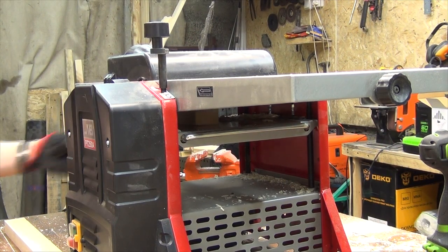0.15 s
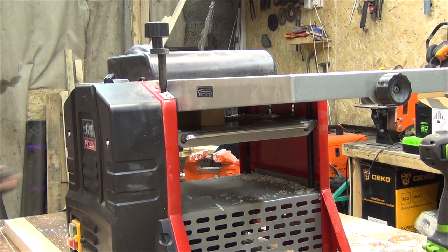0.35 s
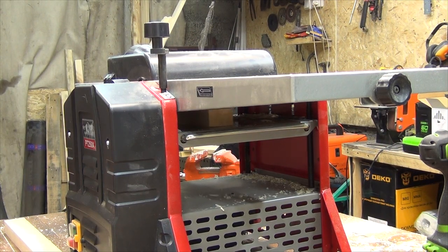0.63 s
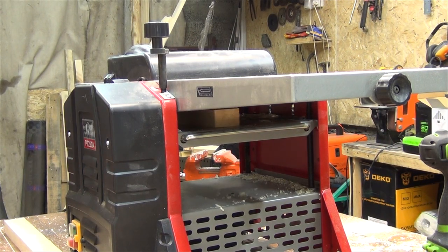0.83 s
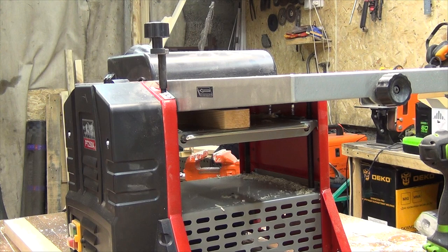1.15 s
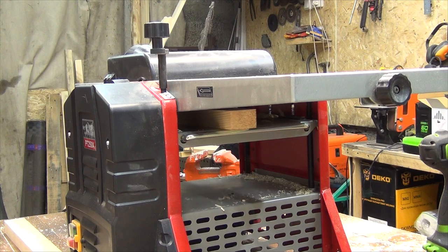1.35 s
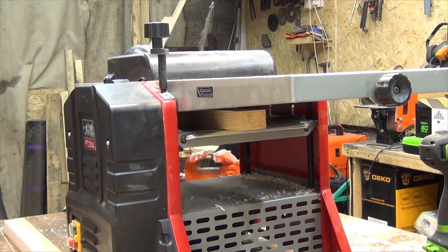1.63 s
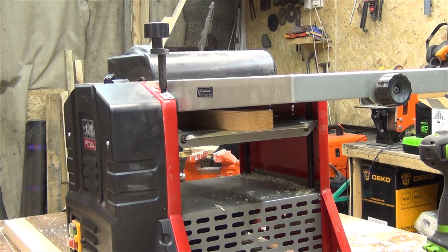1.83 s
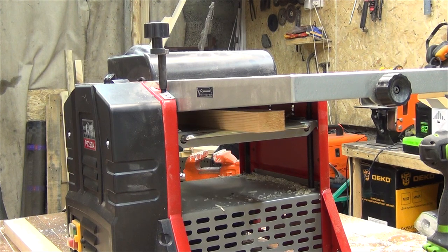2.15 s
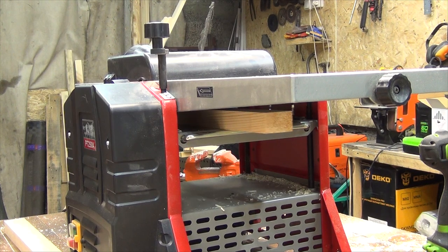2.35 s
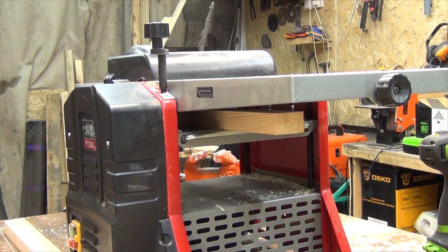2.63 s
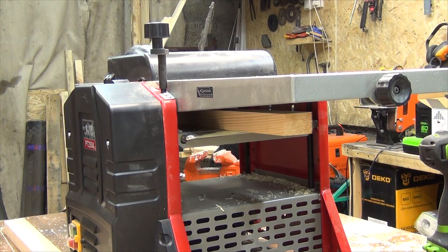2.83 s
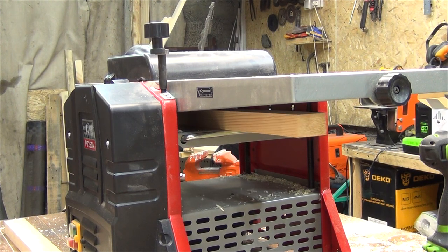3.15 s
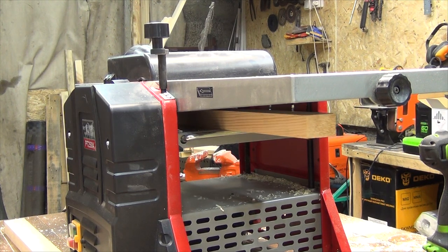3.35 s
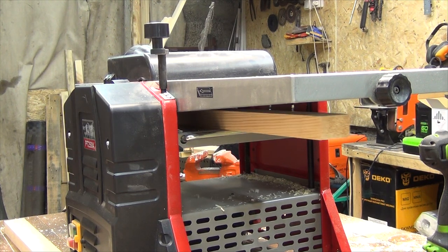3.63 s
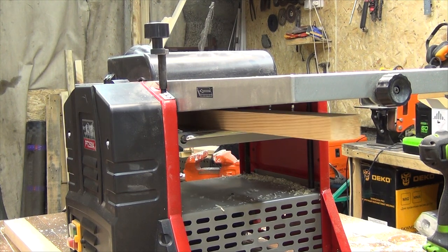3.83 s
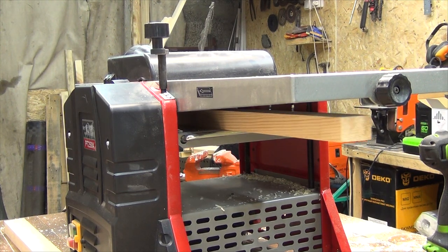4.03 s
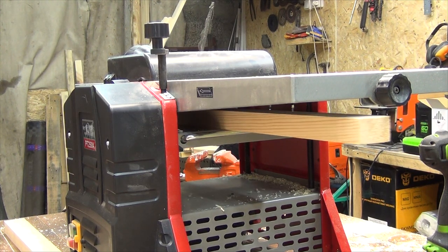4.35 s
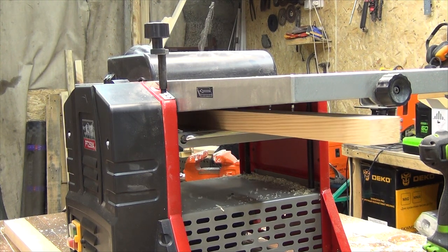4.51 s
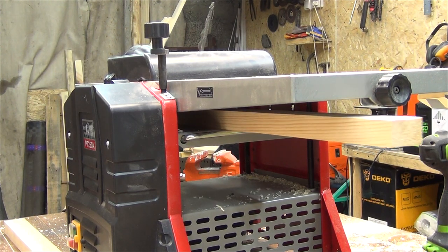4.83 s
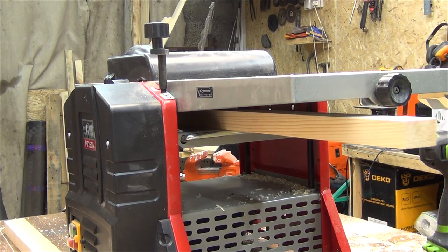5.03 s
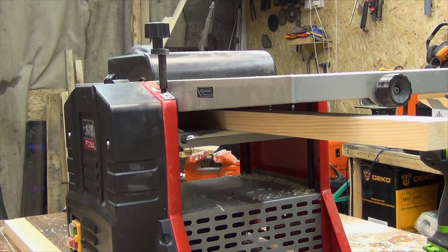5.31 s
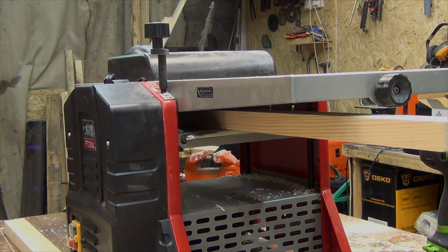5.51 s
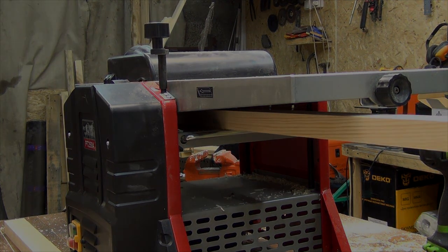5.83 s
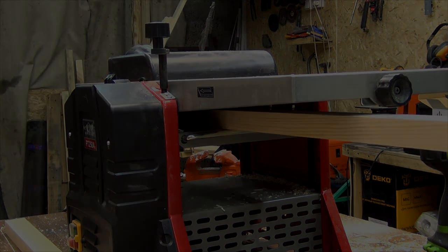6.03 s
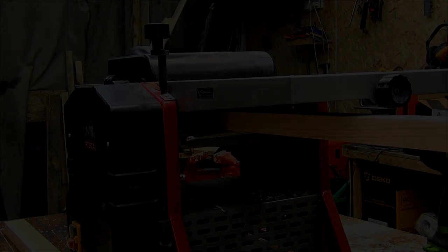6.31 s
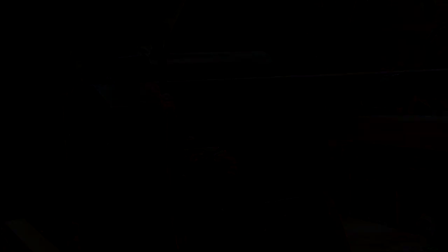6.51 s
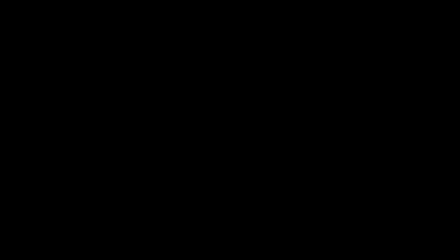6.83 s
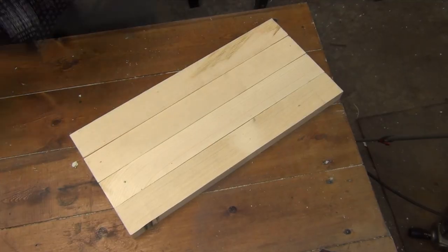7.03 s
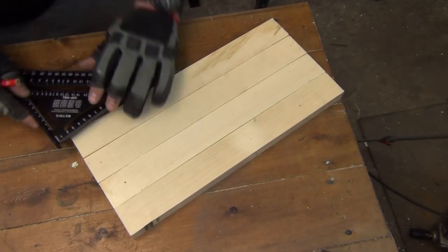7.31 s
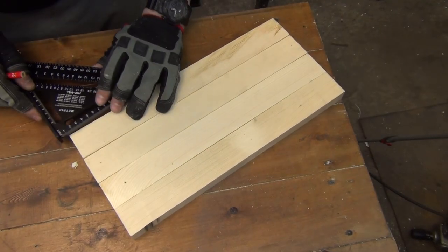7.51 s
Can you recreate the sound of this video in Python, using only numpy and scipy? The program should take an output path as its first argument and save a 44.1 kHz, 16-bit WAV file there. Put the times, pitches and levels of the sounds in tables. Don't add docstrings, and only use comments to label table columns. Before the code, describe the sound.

Close to a thickness planer in a workshop, the motor drone sags in pitch as a board enters, then holds steady with a rough buzz, shifting high whines and hissing wood chips. Late on it drops slightly under harder grain and grows harsher. It cuts off instantly to near silence, where a gloved hand slides a metal square over wood with brief, faint ringing scrapes. A bright camera microphone hears both, nearly mono.

```python
import sys
import numpy as np
from scipy import signal
from scipy.fft import rfft, irfft, next_fast_len
from scipy.io import wavfile
from scipy.ndimage import uniform_filter1d, map_coordinates

SR = 44100
rng = np.random.default_rng(int(sys.argv[2]) if len(sys.argv) > 2 else 0)


def generate_wav(signal):
    frames = np.transpose(np.atleast_2d(signal))
    scaled = np.clip(frames, -1, 1) * 32767
    pcm = np.round(scaled).astype(np.int16)
    wavfile.write(sys.argv[1], SR, pcm)


def boost_factor(decibels):
    exponent = np.asarray(decibels, float) / 20
    return 10 ** exponent


N = 337806
TIME = np.arange(N) / SR
PAD = next_fast_len(N)
FREQ = np.fft.rfftfreq(PAD, 1 / SR) + 1
LOG_FREQ = np.log(FREQ)
HARD_FROM_S, HARD_RISE_S = 5.78, 0.19

# frequency in Hz, side minus mid in dB.
PORT_WIDTH = [(40, 4), (90, -7), (200, -36), (700, -12), (1400, -23), (2200, -26.5), (4800, -17.5),
              (5700, -13), (8000, -17.5), (9200, -24), (11000, -40), (15000, -50)]
# frequency in Hz, left minus right in dB.
PORT_LEAN = [(60, -8), (110, -0.5), (200, -2), (380, 0), (700, 0), (1290, -1), (2380, 0.5), (4400, -0.5),
             (8120, -0.5), (15000, 0.5)]


def noise():
    return rng.standard_normal(N)


def walk(rate, size=8):
    steps = rng.standard_normal(int(N / SR * rate) + 2).astype(np.float32)
    ramps = np.interp(TIME[::size] * rate, np.arange(len(steps)), steps)
    slewed = 1.3 * uniform_filter1d(ramps, int(SR / rate / size))
    return np.repeat(slewed, size)[:N].astype(np.float32)


def arch(s, length):
    out = np.zeros(N, np.float32)
    on = slice(max(int(s * SR), 0), int((s + length) * SR))
    out[on] = np.maximum(np.sin(np.pi * (TIME[on] - s) / length), 0)
    return out


def window(s, length):
    return np.sqrt(arch(s, length))


def arches(table, order):
    return sum(db * arch(s, length) for s, length, k, db in table if round(k) == order)


def columns(table):
    s, *rest = np.transpose(table)
    return [np.interp(TIME, s, c) for c in rest]


def shape_db(points):
    hz, db = np.transpose(points)
    return np.interp(LOG_FREQ, np.log(np.maximum(hz, 1)), db)


def shaped(x, gain):
    return irfft(rfft(x.astype(np.float32), PAD) * gain.astype(np.float32), PAD)[:N]


def colour(x, points, lo_hz=1, hi_hz=30000):
    edges = 1 / np.sqrt((1 + (lo_hz / FREQ) ** 16) * (1 + (FREQ / hi_hz) ** 16))
    y = shaped(x, boost_factor(shape_db(points)) * edges)
    return y / np.std(y)


def resonance(x, hz, width_hz):
    b, a = signal.iirpeak(hz, hz / width_hz, SR)
    y = signal.lfilter(b, a, signal.lfilter(b, a, x))
    return y / np.std(y)


def ports(mid, other, width):
    side = shaped(other, boost_factor(shape_db(width)))
    side = side + shaped(mid, shape_db(PORT_LEAN) * np.log(10) / 40)
    return np.array([mid + side, mid - side])


def hard():
    return np.clip((TIME - HARD_FROM_S) / HARD_RISE_S, 0, 1)


def drum_turns():
    # time in seconds, drum turns in Hz.
    load = [(0, 120.2), (2.5, 120.5), (2.85, 120.1), (3.1, 119.8), (3.5, 120.2), (3.85, 120.1), (4.17, 120),
            (4.57, 120.1), (5.15, 120.6), (5.64, 121.3), (5.74, 120.7), (5.83, 119.5), (5.93, 116.6),
            (6.17, 116.8), (6.31, 115.4), (6.41, 114.8), (6.66, 115.3), (6.87, 116)]
    idle_surplus_hz, slow_down_s = 17.4, 0.85
    hz = columns(load)[0] + idle_surplus_hz * np.exp(-TIME / slow_down_s)
    return np.cumsum(hz) / SR


def order_db(order):
    # order of the turn, steady level in dB, change in dB as the board enters, change in dB on hard grain.
    order_levels = [(1, -65, -4.5, -3.5), (2, -51, -3.5, -7.5), (3, -71, -5, -2), (4, -56.5, 7.5, -1.7),
                    (5, -61, -6.5, 0.7), (6, -55.5, 6, 8), (7, -63, -7, 4), (8, -60.0, 4, 0.5),
                    (9, -69, 7, -3), (10, -51, 0.5, -5), (11, -62, -9, -2), (12, -66.5, 12.5, 7),
                    (13, -64, -2, -6.5), (14, -55.5, -13.5, 0), (15, -64, -13, 1.5), (16, -62, -11, -4),
                    (17, -75.5, -1, -0.5), (18, -68.5, -21, -0.5), (19, -79, -1, 8)]
    # start in seconds, length in seconds,
    # order, change in dB.
    order_swings = [(0.266, 0.45, 12, 2.5), (0.42, 0.45, 10, 4.5), (0.573, 0.64, 6, 6.5), (0.74, 0.41, 9, 8.5),
                    (0.74, 0.65, 17, 11), (0.94, 0.9, 15, 4.5), (0.94, 1.86, 10, 3.5), (1.14, 0.36, 4, 8),
                    (1.18, 0.62, 8, 5.5), (1.22, 0.9, 3, 9.5), (1.3, 0.59, 13, 5), (1.655, 1.5, 9, 7),
                    (1.78, 0.45, 17, 10), (2.3, 1.3, 16, 6), (3.02, 0.9, 17, 11), (3.18, 0.68, 6, 4),
                    (3.42, 0.65, 12, 8), (3.9, 0.66, 6, 3), (4.06, 1.52, 1, 5), (4.18, 0.45, 19, 16),
                    (4.18, 0.96, 13, 4.5), (4.22, 0.9, 15, 4.5), (4.94, 0.93, 12, 8), (5.1, 0.3, 14, 8),
                    (5.38, 0.47, 6, 5.5), (5.7, 0.78, 17, 15), (5.74, 0.2, 16, 8), (5.859, 0.5, 8, 5.5),
                    (6.295, 0.57, 5, 9),
                    (0.5, 0.32, 13, -12.3), (0.54, 0.47, 14, -7), (0.654, 1.44, 4, -10.5), (0.74, 0.3, 12, -13),
            (0.78, 0.49, 16, -11), (0.94, 0.3, 11, -15), (0.94, 1.3, 16, -12.4), (1.26, 0.84, 1, -15),
            (1.3, 0.68, 14, -8), (1.38, 0.42, 7, -17), (1.38, 0.45, 12, -17), (1.7, 0.86, 11, -7),
            (1.9, 0.58, 5, -11), (1.94, 1, 13, -8), (2.02, 1.2, 8, -1.5), (2.22, 0.99, 18, -16),
            (2.98, 0.85, 14, -4), (3.02, 1.44, 10, -3), (3.54, 0.3, 15, -14), (3.54, 0.45, 5, -10),
            (4.26, 1.7, 14, -12), (4.54, 0.37, 12, -14.3), (5.14, 1.35, 18, -16), (5.26, 0.71, 15, -9),
            (5.34, 0.65, 3, -17), (5.496, 0.7, 11, -7.5), (5.705, 0.21, 10, -8), (5.747, 0.43, 6, -9.5),
            (6.097, 0.19, 6, -6.5),
                    (0.098, 0.67, 4, 2.5), (.15, 0.6, 8, 2), (0.222, 0.28, 1, -5), (0.503, 0.55, 1, 3),
             (1.0, 0.23, 6, 1.5), (4.25, .4, 14, 1), (5.858, 0.17, 2, -4), (6.25, 0.22, 8, -12),
             (6.749, .3, 6, -2), (1.35, .3, 9, -11), (1.5, .4, 6, -3), (1.55, .3, 18, 6), (2.1, .5, 9, -6),
             (2.2, .6, 7, 1), (2.25, .4, 12, 5), (2.3, 0.74, 6, 2.5), (2.7, 0.54, 8, -2), (2.8, .45, 9, -2),
             (2.9, 0.77, 18, 8.5), (2.95, .3, 15, -7), (3.3, 0.94, 11, -3), (3.7, .7, 1, 2.5),
             (4.1, .7, 11, 4), (4.1, .5, 13, 2.5), (4.1, 0.59, 8, 2.5), (4.3, .5, 7, -6),
             (4.3, 1.2, 5, 1.5), (4.9, .7, 11, -1.5), (5.0, 0.39, 8, -1.5), (5.3, .4, 13, -4),
             (5.55, .3, 11, 4), (5.75, 0.61, 7, -9), (6.296, 0.56, 18, 5.5), (6.3, 0.62, 13, 5),
             (6.35, .5, 15, -4), (6.4, 0.46, 8, -3)]
    settle_s = 0.79
    _, steady_db, entry_db, hard_db = order_levels[order - 1]
    db = (steady_db + entry_db * np.exp(-TIME / settle_s) + hard_db * hard()).astype(np.float32)
    return db + arches(order_swings, order)


def tones(turns, levels_db, flutter_db=1.0, slip=0.25, spread=0.21):
    # start and length in seconds, order, left minus right in dB.
    thrown = [(.55, 0.85, 6, 0), (.3, .8, 2, -3.5), (1.5, .9, 4, -6), (4.2, .8, 14, 11), (4.4, 1.7, 2, -3),
              (5.2, 0.6, 4, -2.5), (6.0, 1.23, 6, -2)]
    nose_db = -1.3 * arch(1.14, 1.66)
    mid = side = 0
    for order, db in levels_db:
        lean_db = np.interp(order * 120, *np.transpose(PORT_LEAN)) - 0.5 + 0.31 * walk(0.87)
        lean_db = lean_db + nose_db + arches(thrown, order)
        angle = 2 * np.pi * ((order * turns + rng.random()) % 1)
        phase = (angle + slip * walk(30)).astype(np.float32)
        size = np.sqrt(2) * boost_factor(db + flutter_db * walk(24.89))
        tone, ahead = size * np.sin(phase), size * np.cos(phase)
        mid = mid + tone
        side = side + tone * lean_db * (np.log(10) / 40) + ahead * spread * walk(0.9) / 2
    return np.array([mid + side, mid - side])


def hum(turns):
    def family(*orders):
        return [(k, order_db(k)) for k in orders]

    knives = tones(turns, family(2, 4, 6, 10), flutter_db=0.41, slip=0.061)
    board = tones(turns, family(1, 5, 8, 14), flutter_db=0.83, slip=0.074)
    panel = tones(turns, family(7, 12, 15, 16), flutter_db=0.8, slip=0.24)
    wavering = [(k, db + 1.85 * walk(3.93)) for k, db in family(3, 9, 11, 13, 17, 18, 19)]
    return knives + board + panel + tones(turns, wavering)


def knife_burst(turns):
    def beat(order, at):
        return np.cos(2 * np.pi * (order * turns - at))

    burst_db = 2.3 * beat(1, 0) + 1.4 * beat(2, 0.066) + 1.4 * beat(3, 0.24)
    burst_db = burst_db + 1.14 * beat(0.5, 0.23) + 0.79 * beat(0.25, 0)
    burst = boost_factor(burst_db)
    return burst / np.sqrt(np.mean(burst ** 2))


def hood_roar(burst, bite_db):
    # frequency in Hz, density in dB per Hz.
    roar_shape = [(25, -22), (70, -17), (150, -6.5), (330, -3), (550, 1), (750, 0), (1000, -5), (1500, -4),
                  (2300, -7.5), (3000, -27)]
    roar_db = -55 + 1.4 * bite_db - 0.5 * (TIME > HARD_FROM_S) + 1.8 * window(5.5, 0.3)
    return colour(noise() * burst ** 1.13, roar_shape) * boost_factor(roar_db + 0.97 * walk(8))


def chute_drumming(burst):
    return resonance(burst * noise(), 2880, 710) * boost_factor(-66 - 1.5 * TIME)


def repeating(turns, drift, patchy_db, size=384):
    chance = rng.standard_normal((2, 1000, size // 2 + 1))
    phase = np.cumsum(drift * chance[0], axis=0) + 100 * chance[0, 0]
    patches = uniform_filter1d(chance[1], 36, axis=0) * 6
    wound = irfft(boost_factor(patchy_db * patches) * np.exp(1j * phase), size, axis=1).ravel()
    return map_coordinates(wound, [(turns + 30) * size], order=3)


def chips(turns, burst, bite_db, gust):
    # frequency in Hz, density in dB per Hz.
    chip_shape = [(1180, -23), (2000, -7), (2050, -6), (2120, -7), (2290, -7.5), (2870, -4.5), (3460, -5),
                  (4360, -6), (5270, -11), (6410, 0.5), (7950, 3.5), (8290, 0.5), (12000, -18),
                  (15500, -30)]
    # time in seconds, repeating share of the chips from 0 to 1.
    grain = [(0, 0.45), (3.2, 0.47), (4.6, 0.54), (5.7, 0.35), (5.8, 0.65), (5.93, 0.62), (6.0, 0.57),
             (6.33, 0.65), (6.38, 0.5), (6.87, 0.43)]
    # frequency in Hz, width in Hz, lift in dB.
    hood_rings = [(6750, 200, 4.5), (7380, 330, 5), (8180, 270, 3.5)]
    # start in seconds, length in seconds, strength in dB.
    knots = [
        (0.03, 0.11, 3.5),
        (3.62, 0.18, 1),
        (5.07, .08, 2),
        (5.21, .12, 0.5),
        (5.42, 0.082, 0.5),
        (5.62, 0.11, -2),
        (5.74, 0.25, 6),
        (6.049, 0.35, 5),
    ]
    knot_db = sum(db * arch(s, length) for s, length, db in knots)
    clatter_db = -55 + bite_db + 0.76 * knot_db + 0.32 * gust
    hiss_db = -51.5 + bite_db + 0.45 * knot_db + 0.44 * gust
    air_db = -64.5 + 2.3 * bite_db + knot_db + 0.36 * gust
    scratch_db = -87 + 2.8 * knot_db

    share = np.clip(columns(grain)[0], 0, 1)
    comb = repeating(turns, drift=0.14, patchy_db=1.5)
    comb = burst * comb / np.std(comb)
    loose = burst * noise()
    held = share * np.clip(0.68 + 0.3 * arch(5.7, 0.75), 0, 1)
    lift_db = sum(db / (1 + ((FREQ - hz) / width_hz * 2) ** 2) for hz, width_hz, db in hood_rings)
    light = shaped(np.sqrt(held) * comb + np.sqrt(1 - held) * loose, boost_factor(lift_db))
    firm = share ** 0.66 * np.clip(0.7 + 0.45 * arch(5.7, 0.75), 0, 1)
    knocks = (np.sqrt(firm) * comb + np.sqrt(1 - firm) * loose) / burst ** 0.45

    clatter = colour(knocks, chip_shape, lo_hz=2200, hi_hz=5320) * boost_factor(clatter_db)
    hollow = shaped(clatter, 1 / (1 + ((FREQ - 2880) / 650) ** 2))
    clatter = clatter - np.clip(2.7 * (share - 0.45), 0, 0.7) * hollow
    hiss = colour(light, chip_shape, lo_hz=5400, hi_hz=9870) * boost_factor(hiss_db)
    air = colour(light, chip_shape, lo_hz=10040) * boost_factor(air_db)
    scratch = colour(comb * burst, [(9000, 5), (15000, -5)], lo_hz=11000, hi_hz=15000) * boost_factor(scratch_db)
    return clatter + hiss + air + scratch


def shavings(turns):
    # time in seconds, bite in dB.
    cut = [(0, -2), (.15, -2.5), (.7, -0.5), (1.3, 0), (1.9, 0), (2.15, -1), (2.3, -0.5), (2.85, -1.5),
           (3.1, 0.5), (3.4, 0), (3.6, -0.5), (4.2, 0), (4.8, 0), (5.2, 0.5), (5.66, -1), (6.0, -1),
           (6.4, -2), (6.87, -1.5)]
    bite_db = columns(cut)[0]
    burst = knife_burst(turns)
    gust = walk(6)
    pair = []
    for _ in range(2):
        rush = hood_roar(burst, bite_db) + chute_drumming(burst)
        pair.append(rush + chips(turns, burst, bite_db, gust))
    return ports(*pair, PORT_WIDTH)


def whines(turns):
    # start in seconds, length in seconds, order, level in dB.
    whine_swells = [(0.18, 1.4, 24, -65), (0.42, 1.2, 34, -65.5), (0.68, 1, 31, -63.5),
                    (0.68, 1.35, 27, -68), (0.88, 1.4, 36, -66.5), (0.92, 0.56, 37, -65),
                    (0.98, 0.55, 26, -68), (1.03, 0.5, 42, -65), (1.23, 0.83, 35, -62),
                    (1.28, 1.1, 29, -72), (1.387, 1.6, 32, -68), (2.03, 0.7, 20, -63), (2.03, 1, 22, -70),
                    (2.333, 1.2, 26, -71), (2.53, 1.5, 41, -70), (2.58, 1.2, 44, -73), (3.03, 1.8, 25, -70),
                    (3.13, 0.65, 20, -67), (3.18, 1.4, 22, -75), (3.38, 0.5, 21, -63.5),
                    (3.38, 0.7, 36, -57), (3.48, 0.56, 35, -63), (3.53, 0.7, 33, -64),
                    (3.68, 0.89, 23, -64.0), (3.78, 0.35, 32, -61.0), (4.12, 1.4, 34, -61.0),
                    (4.38, 0.5, 40, -66.0), (4.38, 0.58, 37, -60), (4.47, 0.37, 34, -62.5),
                    (4.47, 1.5, 20, -69), (4.52, 0.54, 20, -64.0), (4.52, 1.5, 35, -67),
                    (4.58, 1, 38, -61.5), (4.62, 0.7, 30, -61), (4.68, 1.7, 22, -66), (4.72, 0.63, 31, -62),
                    (4.72, 0.7, 39, -65), (4.82, 0.77, 33, -61), (4.92, 0.44, 36, -60),
                    (5.08, 1.4, 21, -69), (5.28, 0.48, 37, -58.5), (5.32, 0.61, 20, -66),
                    (5.42, 1.5, 46, -66), (5.62, 0.69, 40, -67), (5.62, 1, 28, -63), (5.72, 0.92, 37, -68),
                    (5.78, 0.8, 29, -65.5), (5.88, 0.66, 36, -65.0), (6.02, 0.47, 33, -59),
                    (6.18, 0.85, 35, -63.5),
                    (0.22, 0.39, 62, -61.0), (0.22, 1, 52, -66), (0.28, 0.6, 51, -63.5), (0.28, 1, 63, -62),
                   (0.52, 0.7, 59, -61.0), (0.62, 0.7, 64, -59), (0.62, 1.3, 53, -61), (0.68, 1.4, 65, -59),
                   (0.72, 1.7, 60, -67), (1.03, 1.5, 54, -64), (1.03, 1.6, 66, -59), (1.28, 1.7, 69, -63.5),
                   (1.52, 0.64, 55, -59), (1.58, 0.5, 59, -58), (1.58, 1.2, 67, -66),
                   (1.78, 1.4, 60, -63.0), (1.88, 1.4, 66, -55), (2.22, 1.6, 56, -62),
                   (2.72, 1.2, 55, -59.5), (3.13, 1.4, 60, -65), (3.13, 1.2, 74, -62),
                   (3.18, 0.77, 54, -60), (3.22, 0.55, 52, -62.0), (3.82, 0.5, 65, -58),
                   (3.88, 0.7, 54, -61.5), (3.98, 1, 66, -62.0), (4.12, 0.91, 67, -63.0),
                   (4.22, 1.2, 74, -68.0), (4.27, 1.1, 55, -59.5), (4.32, 0.5, 50, -62),
                   (4.47, 0.46, 55, -59.5), (4.58, 1.5, 48, -64), (4.62, 1.3, 56, -61.0),
                   (4.78, 1.4, 60, -62.0), (4.88, 1.4, 67, -67), (4.97, 0.5, 62, -62), (5.18, 1.4, 66, -53),
                   (5.32, 1.4, 68, -61.5), (5.48, 1.31, 69, -65), (5.52, 1, 55, -61.0), (5.62, 1, 73, -62),
                   (5.68, 0.87, 71, -60), (5.68, 1.1, 77, -62), (5.78, 0.7, 57, -65), (5.78, 0.59, 70, -58),
                   (5.88, 0.44, 62, -58), (5.88, 0.7, 56, -59), (5.88, 1.1, 65, -59.5),
                   (5.98, 0.46, 63, -62), (6.18, 0.7, 64, -55.5)]
    swelling = whine_swells
    chance = rng.random((80, 2))
    throb = (1 + 0.12 * np.cos(2 * np.pi * turns)) * boost_factor(0.6 + 1.74 * walk(20))
    slip = 0.21 * walk(40)
    out = np.zeros((2, N))
    for order in sorted({round(k) for _, _, k, _ in swelling}):
        start, place = chance[order]
        power = sum(boost_factor(2 * db) * arch(s, length) for s, length, k, db in swelling if round(k) == order)
        on = np.flatnonzero(power)
        tone = np.sqrt(power[on]) * np.sin(2 * np.pi * (order * turns[on] + start) + slip[on])
        out[:, on] += tone * boost_factor(4.1 * (place - 0.5) * np.array([[1], [-1]]))
    return out * throb


def planer():
    turns = drum_turns()
    return hum(turns) + whines(turns) + shavings(turns)


def stroke(s, length):
    attack_s, release_s = 0.0085, 0.019
    since = (TIME - s).astype(np.float32)
    return np.clip(since / attack_s, 0, 1) * np.exp(-np.maximum(since - length, 0) / release_s)


def singing(hz, width_hz, s, grit, waver):
    if width_hz > 100:
        return resonance(grit, hz, width_hz)
    wander = hz * (1 - 0.2 * np.clip(TIME - s, 0, 0.1)) + width_hz * waver
    tone = np.sqrt(2) * np.sin(2 * np.pi * np.cumsum(wander) / SR)
    return tone * boost_factor(2.0 * np.roll(waver, int(hz)))


def sliding_square():
    # frequency in Hz, density in dB per Hz.
    scrape_shape = [(1470, -52), (2500, -14), (4010, -10), (4860, -14), (5360, -9), (6060, -8), (6200, -11),
                    (7510, -2.5), (11500, -23), (15500, -37)]
    # start in seconds, length in seconds, scrape in dB, thump in dB, ring in dB.
    strokes = [(6.872, 0.033, -73, -89, -86), (6.921, 0.044, -58, -68, -64), (6.972, 0.024, -58, -67, -70),
               (7.018, 0.03, -65, -69, -75), (7.12, .015, -72, -86, -92), (7.147, 0.025, -72, -81, -84),
               (7.19, .025, -71, -74, -69), (7.25, 0.037, -83, -88, -81), (7.387, .08, -81, -81, -92),
               (7.495, .02, -81, -81, -95), (7.53, .12, -93, -83, -95), (7.642, .02, -82, -88, -95)]
    # start in seconds, length in seconds, frequency in Hz, width in Hz, level in dB.
    square_rings = [(6.92, 0.06, 4070, 53, -63), (6.985, 0.03, 5540, 150, -63),
                    (6.965, 0.045, 6370, 40, -63), (6.972, 0.018, 1230, 500, -62),
                    (6.925, .04, 7330, 60, -62), (6.925, .035, 7680, 70, -63), (6.935, .03, 6860, 130, -63),
                    (6.975, .03, 7330, 130, -63), (6.96, .09, 3660, 41, -72), (6.97, .09, 2990, 60, -74),
                    (6.92, 0.11, 8900, 40, -73), (7.03, .025, 1700, 200, -70), (7.02, 0.031, 7280, 60, -69),
                    (7.022, 0.014, 820, 700, -67), (7.5, .2, 3030, 150, -84), (7.5, 0.14, 3450, 150, -83),
                    (7.4, .075, 6870, 50, -79), (7.54, .05, 6200, 70, -86), (7.25, .2, 126, 32, -82)]
    scrape, thump, ring = sum(boost_factor(np.array(db)).astype(np.float32)[:, None] * stroke(s, length)
                              for s, length, *db in strokes)
    pair = []
    for _ in range(2):
        grit = noise() * boost_factor(1.9 * walk(400))
        slide = colour(grit, scrape_shape) * scrape + resonance(grit, 1350, 2600) * thump
        pair.append(slide + resonance(noise(), 6850, 50) * ring * boost_factor(-4.5))
    slide, slide_b = pair
    waver = walk(300)
    for s, length, hz, width_hz, db in square_rings:
        slide = slide + singing(hz, width_hz, s, grit, waver) * boost_factor(db) * window(s, length)
    return ports(slide, slide_b, PORT_WIDTH)


def shop_hush():
    # frequency in Hz, density in dB per Hz.
    hush_shape = [(12, -30), (20, -8), (80, -10), (126, -6.5), (546, -14.5), (1020, -9.5), (1200, -11.5),
                  (1800, -22), (3840, -20), (4640, -23), (6970, -22), (13000, -32.5)]
    # frequency in Hz, side minus mid in dB.
    hush_width = [(60, -6), (110, -12), (200, -11), (380, -12), (700, -15), (1290, -14), (2380, -13),
                  (4400, -17), (8120, -9), (15000, -19)]
    # frequency in Hz, level in dB.
    hums = [
        (48.4, -87),
        (15628, -90),
    ]
    hush, hush_b = [colour(noise(), hush_shape, hi_hz=12900) * boost_factor(-72 + walk(7.4)) for _ in range(2)]
    for hz, db in hums:
        hush = hush + np.sqrt(2) * boost_factor(db) * np.sin(2 * np.pi * hz * TIME)
    return ports(hush, hush_b, hush_width)


def bench():
    return sliding_square() + shop_hush()


def scene():
    change_s, fade_s = 6.875, 0.0045
    before = np.clip((change_s - TIME) / fade_s, 0, 1)
    return planer() * before + bench() * (1 - before)


def top_cut(x):
    return signal.sosfilt(signal.butter(12, 15650, fs=SR, output="sos"), x)


def record(dry):
    drive = 21.4
    mix = np.tanh(drive * dry) / drive
    return top_cut(mix)


dry = scene()
out = record(dry)
generate_wav(out)
```